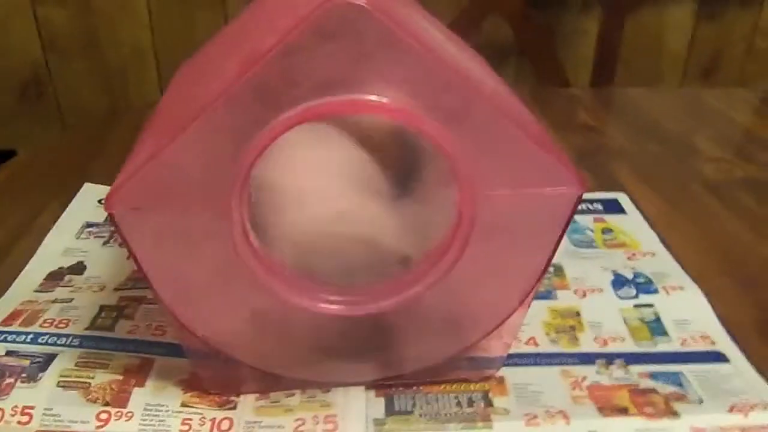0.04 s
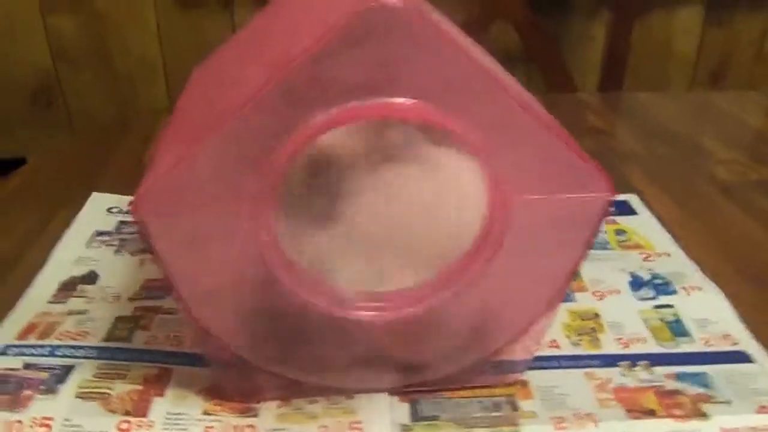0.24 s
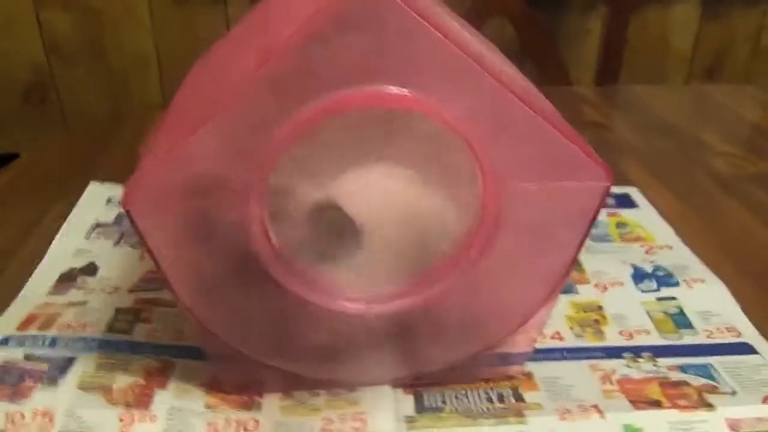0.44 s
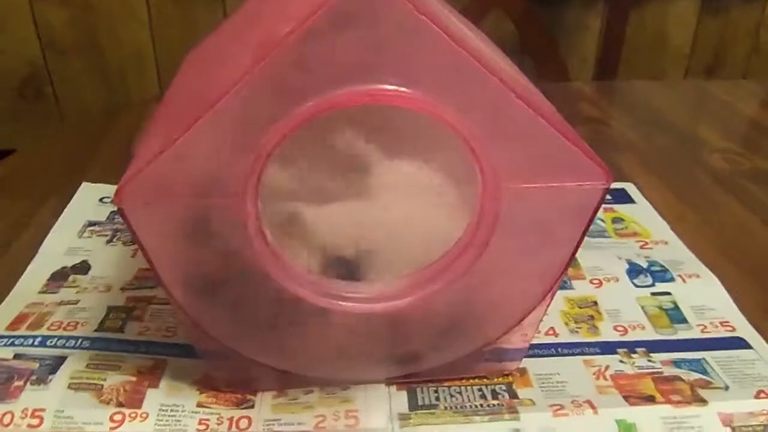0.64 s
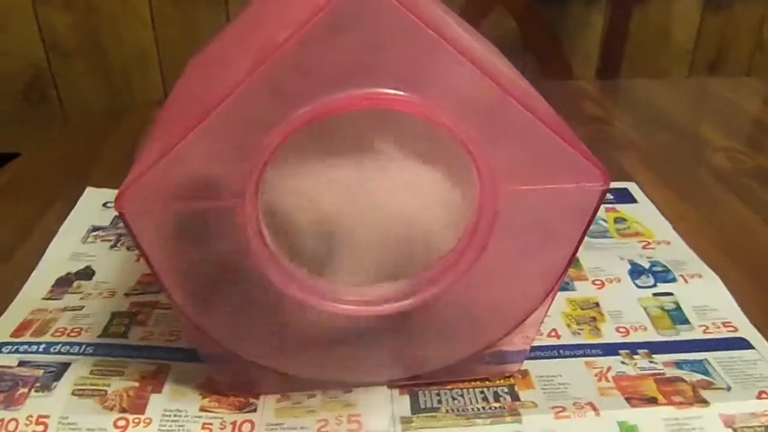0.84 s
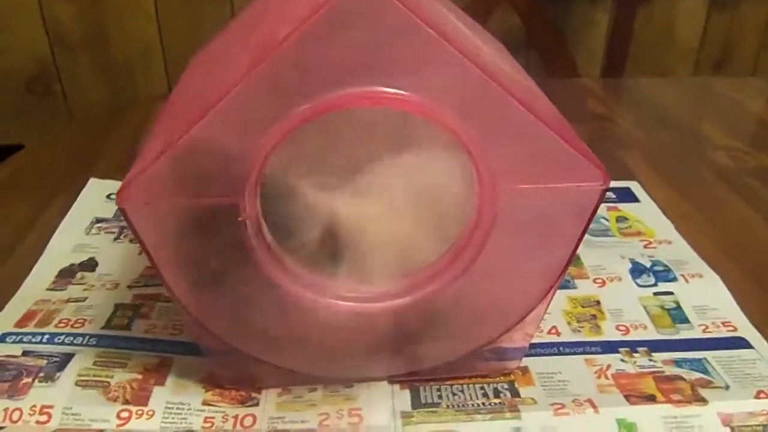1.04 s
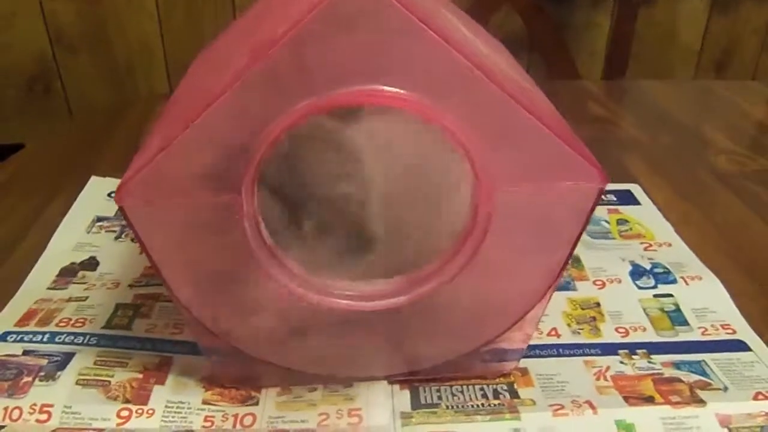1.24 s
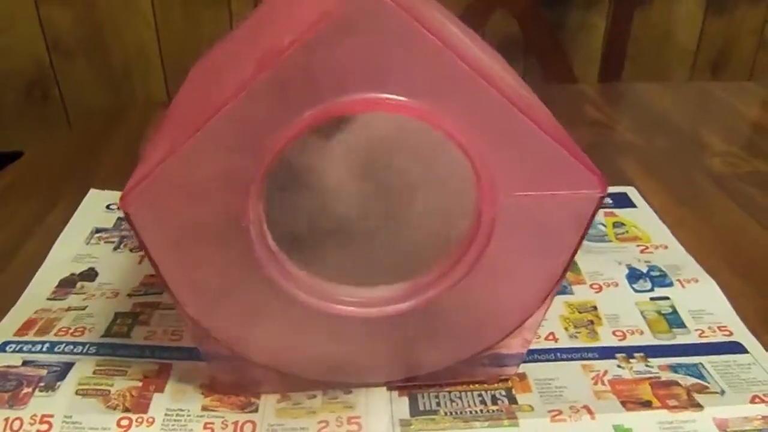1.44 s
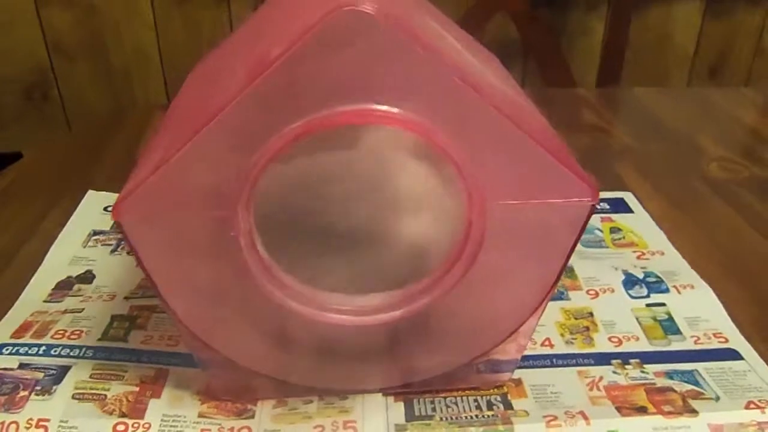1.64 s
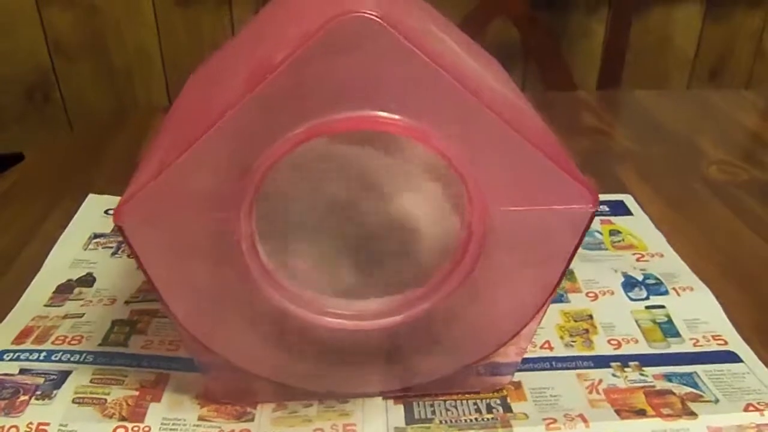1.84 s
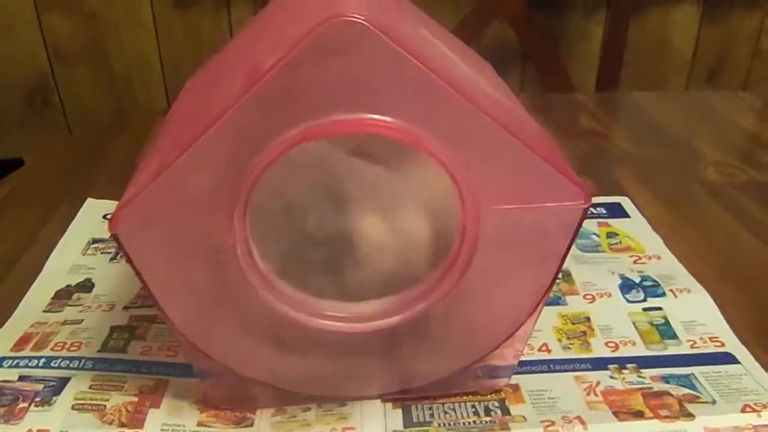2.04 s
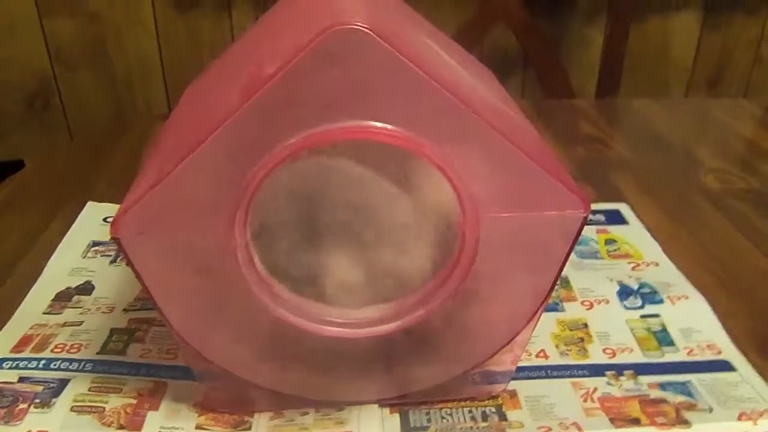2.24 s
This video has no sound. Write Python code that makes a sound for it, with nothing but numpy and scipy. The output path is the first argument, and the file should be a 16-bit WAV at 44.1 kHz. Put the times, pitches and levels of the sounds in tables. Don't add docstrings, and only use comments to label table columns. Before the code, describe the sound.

Hollow, boomy knocks of a body against thin plastic, with claws ticking and dust hissing, strongest in the first half second, easing, then returning in softer bouts before dying down; heard close, indoors, over faint room hush.

```python
import sys
import numpy as np
from scipy import signal
from scipy.io import wavfile

SR = 44100
rng = np.random.default_rng(int(sys.argv[2]) if len(sys.argv) > 2 else 0)


def unload_audio(sound):
    columns = np.transpose(np.atleast_2d(sound))
    steps = np.round(np.clip(columns, -1, 1) * 32767)
    wavfile.write(sys.argv[1], SR, steps.astype(np.int16))


def gain_from_db(level_db):
    decades = np.asarray(level_db, float) / 20
    return 10 ** decades


N = 101430


def rms_one(x):
    return x / np.sqrt(np.mean(x ** 2) + 1e-20)


def bandpass(x, edges_hz):
    return signal.sosfilt(signal.butter(2, edges_hz, "band", fs=SR, output="sos"), x)


def add_at(out, s, sound):
    at = int(s * SR)
    out[at:at + len(sound)] += sound


def drift(rate_hz):
    r = np.exp(-80 * np.pi * rate_hz / SR)
    noise = rng.standard_normal(N // 40 + 2002)
    slow = signal.lfilter([1], [1, -2 * r, r * r], noise)[2000:]
    return np.interp(np.arange(N) / 40, np.arange(len(slow)), rms_one(slow))


def white():
    return rng.standard_normal(N)


def grains(per_s, spread_db):
    sizes = gain_from_db(spread_db * np.minimum(rng.exponential(1, N), 5))
    signs = rng.choice([-1, 1], N)
    return sizes * signs * (rng.random(N) < per_s / SR)


def coloured(make, spectrum, patchy_db):
    out, together = 0, drift(14)
    edges = 20 * 2 ** np.arange(0, 9.7, .5)
    sources = [make(), make()]
    hz, db = np.transpose(spectrum)
    for k, (low, high) in enumerate(zip(edges, edges[1:])):
        level_db = np.interp(np.log(low * high) / 2, np.log(hz), db, left=-90)
        flicker_db = patchy_db * (together + 1.33 * drift(30))
        out = out + bandpass(sources[k % 2], [low, high]) * gain_from_db(level_db + flicker_db)
    return rms_one(out)


# (frequency [Hz], density [dB per Hz])
ROOM_COLOUR = [(20, 21.5), (48, 19.5), (80, -24), (250, -23), (500, 2.5), (14000, -31)]
ROOM_DB = -55


def room_hush():
    return gain_from_db(ROOM_DB) * coloured(white, ROOM_COLOUR, patchy_db=.5)


def ring(clicks, hz, t60):
    r, w = np.exp(-np.log(1000) / (t60 * SR)), 2 * np.pi * hz / SR
    return signal.lfilter([0, np.sin(w)], [1, -2 * r * np.cos(w), r * r], clicks + 1e-18)


# (frequency [Hz], level [dB], t60 [s])
SHELL_MODES = [(113, -23.5, 0.25), (143.3, -8, 0.45), (208.85, -8.5, 0.3), (224.7, -10.5, 0.23),
               (269.7, -15.5, 0.31), (293.4, -9.5, 0.21), (350, -16.5, 0.26), (418, -29, 0.11),
               (429, -37.5, 0.45), (459.4, -25, 0.23), (474, -28, 0.28)]
# (time [s], level [dB])
SHUFFLE_LEVEL = [(0, -32), (.13, -40.5), (.3, -27.5), (.5, -35), (.75, -42), (.88, -52.5), (1.0, -33.5),
                 (1.3, -37.5), (1.5, -36.5), (1.8, -40.5), (2.0, -32), (2.3, -58.5)]
BUMPS_PER_S, SHUFFLE_DB = 150, -2


def shuffle():
    s, db = np.transpose(SHUFFLE_LEVEL)
    level_db = np.interp(np.arange(N) / SR, s, db)
    murmur = 0
    for hz, mode_db, t60 in SHELL_MODES:
        bumps = grains(BUMPS_PER_S, 3.9)
        murmur = murmur + gain_from_db(mode_db) * ring(bumps, hz, 0.72 * t60)
    soft = signal.butter(3, 420, fs=SR, output="sos")
    return gain_from_db(level_db + SHUFFLE_DB) * rms_one(signal.sosfilt(soft, murmur))


# (centre time [s], half length [s], hiss level [dB], scrape share [dB])
DUST_SWELLS = [(0.007, 0.092, -48, 0.5), (0.09, 0.06, -44.5, -5), (0.165, 0.03, -48, 2.5),
               (0.209, 0.021, -42, 1), (0.272, 0.034, -40, -8), (0.323, 0.025, -45.5, -1.5),
               (0.401, 0.037, -40, -2.5), (0.456, 0.034, -43.5, -28), (0.511, 0.021, -46, -10.5),
               (0.582, 0.051, -51, -4), (0.66, 0.11, -62.5, -19), (0.785, 0.045, -55, -2),
               (0.9, 0.087, -57, 1.5), (0.981, 0.067, -56, 3), (1.06, 0.015, -60, 7),
               (1.138, 0.028, -53, 2), (1.204, 0.026, -57, 4.5), (1.269, 0.039, -48, 3),
               (1.388, 0.027, -49.5, 6.5), (1.455, 0.039, -52, 7), (1.546, 0.05, -50, 1.5),
               (1.633, 0.045, -54.5, 0), (1.705, 0.061, -53.5, 5), (1.744, 0.02, -59, 10),
               (1.899, 0.019, -60, 6.5), (1.984, 0.042, -56, 8.5), (2.037, 0.024, -58, 7.5),
               (2.138, 0.045, -54, 8), (2.2, 0.028, -52, 4.5), (2.275, 0.017, -55.5, 7)]
# (frequency [Hz], density [dB per Hz])
HISS_COLOUR = [(1470, -53), (2500, -8), (4010, -3.5), (12500, -5), (14200, -8)]
# (frequency [Hz], density [dB per Hz])
SCRAPE_COLOUR = [(500, -8.5), (850, -3.5), (1200, -5.5), (2200, -5.5), (2950, -6), (4200, -19), (6500, -70)]
SCRAPE_DB, SETTLING_DB = -3, -61


def dust():
    s, half, db, scrape_db = np.transpose(DUST_SWELLS)[:, :, None]
    swell = np.exp(-((np.arange(N) / SR - s) / half) ** 2)
    hiss = coloured(lambda: grains(8600, 3), HISS_COLOUR, patchy_db=1.55)
    scrape = coloured(lambda: grains(1600, 3.37), SCRAPE_COLOUR, patchy_db=1.1)
    power = gain_from_db(2 * db) * swell ** 2
    settling = gain_from_db(2 * SETTLING_DB)
    hiss_level = np.sqrt(power.sum(0) + settling)
    scrape_level = np.sqrt((power * gain_from_db(2 * scrape_db)).sum(0) + settling)
    return hiss_level * hiss + scrape_level * gain_from_db(SCRAPE_DB) * scrape


def bending_waves(peak_db, t):
    to_hz, fall_s, rise_s, dies_s = 140, .0063, .0016, .0078
    from_hz = 380 + 4.5 * (peak_db - peak_db.max())[:, None]
    hz = to_hz + (from_hz - to_hz) * np.exp(-(t / fall_s) ** 2)
    turns = np.cumsum(hz, axis=1) / SR
    envelope = (1 - np.exp(-(t / rise_s) ** 2)) * np.exp(-(t / dies_s) ** 4)
    return np.sin(2 * np.pi * turns) * envelope


def crack(noise, t):
    level_db, hz, t60 = -24.5, 720, .19
    dull = rms_one(bandpass(noise, [hz / 1.5, hz * 1.45]))
    return dull * gain_from_db(level_db - 60 * t / t60) * (1 - np.exp(-t / .0063))


# (time [s], peak level [dB], boom share [dB], floor share [dB], side wall share [dB])
BODY_THUDS = [(0.2030, -8, -7, -7, -7.5), (0.2548, -11, -6.5, -8.5, -2), (0.3915, -8, 6, -15, -11),
              (0.4106, -9, -1, 0, -2), (0.4259, -12, 0, 1, -6), (0.5784, -18, 4, -1, -0.5),
              (0.9105, -14.5, 4.5, -3.5, -2), (0.9458, -17.5, 1, 1, -2.5), (1.1873, -17.5, -0.5, -0.5, 3),
              (1.2475, -17.5, -1, -2.5, 0), (1.3559, -14.5, -5, -0.5, -0.5), (1.391, -12.5, 5, -1.5, 1),
              (1.5374, -14, 3, 1, 3), (1.572, -20, 5.5, -1, 5.5), (1.652, -13.5, 4, -5, 0),
              (1.8275, -20, 4.5, -4, -8), (1.92, -25, 10, -9, 2.5), (1.976, -26, 9, 3.5, 2.5),
              (2.009, -24, 9, -1, 1)]
# (time [s], peak level [dB], boom share [dB], floor share [dB], side wall share [dB])
PAW_FALLS = [(0.038, -28, 3, 3, 7), (0.151, -29.5, 12.5, 6, -3), (0.32, -19.5, -6, -9, -1),
             (0.358, -21, -2, 6.5, -3), (0.447, -20, 0, 4, 7), (0.495, -18.5, 0.5, -9, -10),
             (0.531, -25.5, -14, -8, 3), (.645, -33, 4, 7, 0), (0.684, -25, -9, 1.5, -15),
             (0.751, -41.5, -16, 9, 3), (.806, -41, 5.5, -8, 6), (0.926, -25, -9, 10, -8),
             (.978, -21.5, -3, 3.5, -1), (1.051, -31.5, -4, -7, 0), (1.087, -22.5, -25, -5, -7.5),
             (1.119, -29.5, 9.5, -6, -10), (1.285, -26, 4, -12, 3.5), (1.474, -23, -9, -10, 6),
             (1.501, -23, -7, -18, 1), (1.696, -32.5, 13, 6.5, 2.5), (1.892, -28.5, 2, -7, 3.5),
             (2.066, -31.5, -1, 2, -2.5), (2.135, -42.5, 19, 8, 6), (2.202, -41, 2, -1.5, 4)]
# (boom [s], floor [s], side walls [s])
SWELL_S = (.009, .010, .010)
WAVE_DB, MODE_SCATTER_DB = -1, 2
MUTING_DB, MUTE_S = -26, .02


def thuds():
    rows = np.vstack([BODY_THUDS, PAW_FALLS])
    rows = rows[np.argsort(rows[:, 0])]
    t = np.arange(SR // 3) / SR
    hz, level_db, t60 = np.transpose(SHELL_MODES)[:, :, None]
    part = (hz[:, 0] > 180) * 1 + (hz[:, 0] > 250)
    lag = np.array(SWELL_S)[part, None]
    swing = np.exp(2j * np.pi * hz * (t - lag))
    modes = swing * (1 - np.exp(-(t / lag) ** 4)) * gain_from_db(level_db - 60 * t / t60)
    waves = bending_waves(rows[:, 1], t)
    hard = np.append(rows[rows[:, 1] > MUTING_DB, 0], N / SR + 1)
    gaps = hard[np.searchsorted(hard, rows[:, 0], "right")] - rows[:, 0]
    out = np.zeros(N + SR)
    for row, gap, wave in zip(rows, gaps, waves):
        scatter_db = MODE_SCATTER_DB * rng.standard_normal(len(part))
        phase = (part > 0) * rng.standard_normal(len(part))
        strikes = gain_from_db(row[2 + part] + scatter_db) * np.exp(1j * phase)
        rings = (strikes @ modes).imag * np.exp(-np.maximum(t - gap, 0) / MUTE_S)
        snap = crack(rng.standard_normal(len(t)), t)
        add_at(out, row[0], gain_from_db(row[1]) * (gain_from_db(WAVE_DB) * wave + snap + rings))
    return out[:N]


# (time [s], peak level [dB], centre [Hz], rise [s])
CLAW_TICKS = [(.2044, -23, 3470, 0.00094), (.2538, -32, 1900, 0.0016), (.3536, -37, 1800, 0.0028),
              (.3711, -31, 8000, 0.0005), (.3935, -17, 5230, 0.0012), (.414, -22, 8060, 0.0007),
              (.4372, -11.5, 9400, 0.00044), (0.4939, -28, 1390, 0.00257), (.5222, -44, 5430, 0.00094),
              (.5606, -31, 10700, 0.00068), (.580, -37, 2750, 0.00094), (.6215, -33, 6150, 0.00098),
              (.677, -38.5, 1900, 0.0016), (0.7024, -31, 13100, 0.00031), (0.912, -29.5, 2180, 0.0012),
              (0.9410, -33, 1920, 0.00045), (1.086, -38, 1570, 0.0016), (1.1343, -23.5, 3650, 0.0022),
              (1.1867, -31.5, 1290, 0.0011), (1.2225, -33, 9900, 0.00071), (1.2585, -30, 2550, 0.0023),
              (1.473, -40, 1490, 0.0017), (1.3573, -22.5, 3900, 0.0011), (1.369, -22, 6500, 0.00076),
              (1.389, -38, 2460, 0.0018), (1.5219, -30, 12500, 0.00055), (1.5379, -31, 2920, 0.00088),
              (1.6053, -37, 2940, 0.0017), (1.8287, -32, 2970, 0.0009), (1.921, -35.5, 2520, 0.0012)]
# (time [s], peak level [dB], centre [Hz])
CLAW_KNOCKS = [(.164, -37, 950), (.254, -26, 975), (0.319, -36, 1400), (.353, -30.5, 830), (.391, -24, 980),
               (.414, -25.5, 1220), (.508, -26.5, 870), (.9412, -21.5, 1060), (.953, -28, 960),
               (1.19, -30, 895), (1.357, -29.5, 1100), (1.3685, -25, 1120), (1.389, -32, 1040),
               (1.4545, -29.5, 950), (1.4755, -39.5, 950), (1.538, -36, 950), (1.607, -35.5, 1430),
               (1.6645, -38, 825), (1.688, -39.5, 1860), (2.139, -34, 2600), (2.199, -41, 1950),
               (2.274, -37, 2540), (0.432, -44, 1000), (.369, -40.5, 890), (.968, -28.5, 840),
               (1.404, -33, 1010), (1.552, -35, 890)]
KNOCK_RISE_CYCLES = 1.3
SNAP_SHARE = 1.3
TICK_WIDTH_OCTAVES, WIDER_OCTAVES_PER_DB, SOFT_TICK_DB = .6, .12, -33


def claws():
    out, t = np.zeros(N + SR), np.arange(SR // 20) / SR
    knocks = [(s, db, hz, KNOCK_RISE_CYCLES / hz) for s, db, hz in CLAW_KNOCKS]
    for s, db, hz, rise in list(CLAW_TICKS) + knocks:
        octaves = TICK_WIDTH_OCTAVES + WIDER_OCTAVES_PER_DB * max(db - SOFT_TICK_DB, 0)
        edges = np.minimum(hz * 2 ** (octaves * np.array([-.5, .5])), [15000, 16000])
        grit = rng.standard_normal(len(t)) * t / rise * np.exp(1 - t / rise)
        grit[int(rise * SR / 2)] += SNAP_SHARE * np.linalg.norm(grit)
        burst = bandpass(grit, edges)
        add_at(out, s, burst * gain_from_db(db - 3) / np.abs(burst).max())
    return out[:N]


# (time [s], peak level [dB], rise [s])
ROOF_FLEXES = [(0.214, -27, 0.0091), (0.267, -29, 0.011), (0.405, -24.5, 0.0049), (0.449, -38, 0.013),
               (0.499, -31, 0.0031), (0.592, -35.5, 0.0064), (0.925, -35, 0.0084), (0.983, -40, 0.0067),
               (1.133, -40.5, 0.006), (1.257, -35.5, 0.0094), (1.369, -27, 0.0058), (1.408, -31, 0.0095),
               (1.471, -40.5, 0.0089), (1.515, -39, 0.0071), (1.552, -29, 0.008), (1.666, -32.5, 0.0075),
               (1.707, -42, 0.006), (1.842, -35.5, 0.0067), (1.933, -35.5, 0.0054), (1.988, -41, 0.0073),
               (2.019, -38, 0.0067)]
ROOF_HZ, ROOF_SCATTER_HZ = 583, 9.9
ROOF_LEAD_S = .003


def roof():
    out, t = np.zeros(N + SR), np.arange(SR // 8) / SR
    for s, db, rise in ROOF_FLEXES:
        detune, phase = rng.standard_normal(2)
        swell = (t / rise * np.exp(1 - t / rise)) ** 2
        hz = ROOF_HZ + ROOF_SCATTER_HZ * detune
        add_at(out, s - ROOF_LEAD_S, gain_from_db(db) * swell * np.sin(2 * np.pi * hz * t + 3 * phase))
    return out[:N]


def scene():
    no_deep_bass = signal.butter(2, 89, "high", fs=SR, output="sos")
    shell = signal.sosfilt(no_deep_bass, shuffle() + thuds() + roof())
    return (room_hush() + shell + dust() + claws())[None]


def low_pass(x):
    return signal.sosfilt(signal.butter(12, 15270, fs=SR, output="sos"), x)


def record(dry):
    top_cut = signal.ellip(10, .5, 30, 14050, fs=SR, output="sos")
    mix = signal.sosfilt(top_cut, dry)
    return low_pass(mix)


dry = scene()
out = record(dry)
unload_audio(out)
```